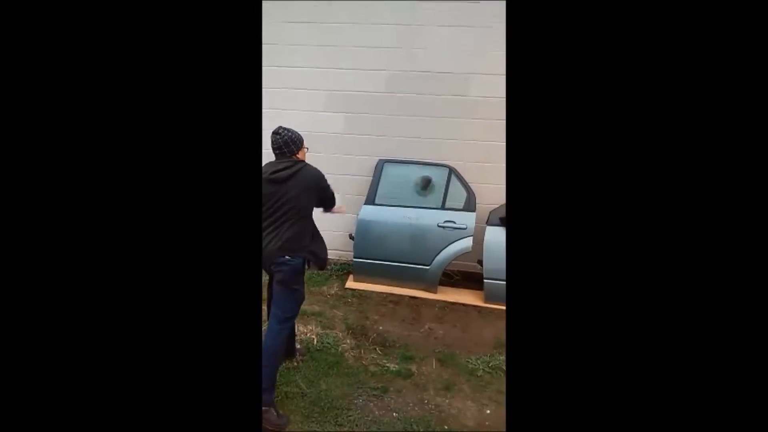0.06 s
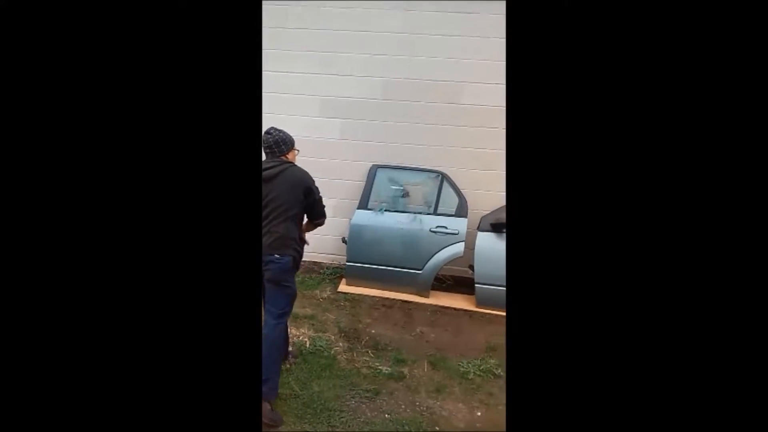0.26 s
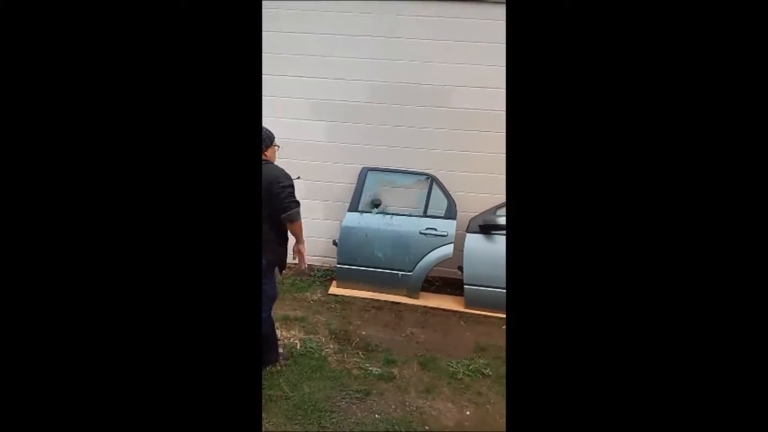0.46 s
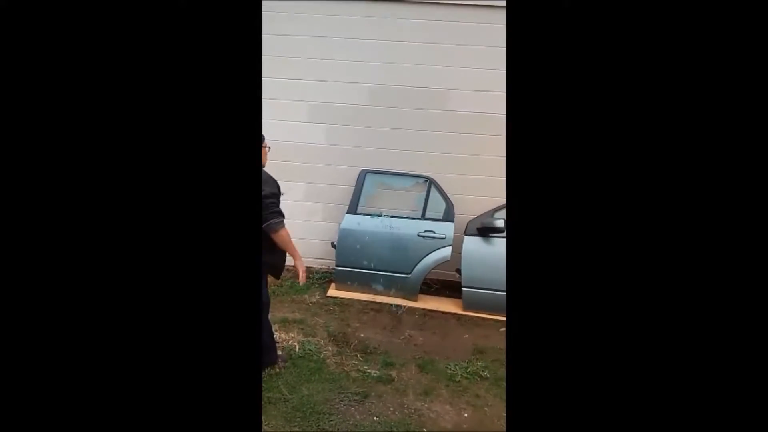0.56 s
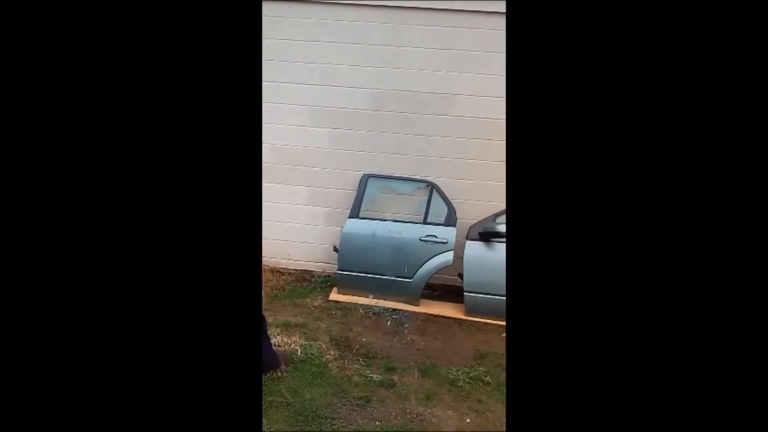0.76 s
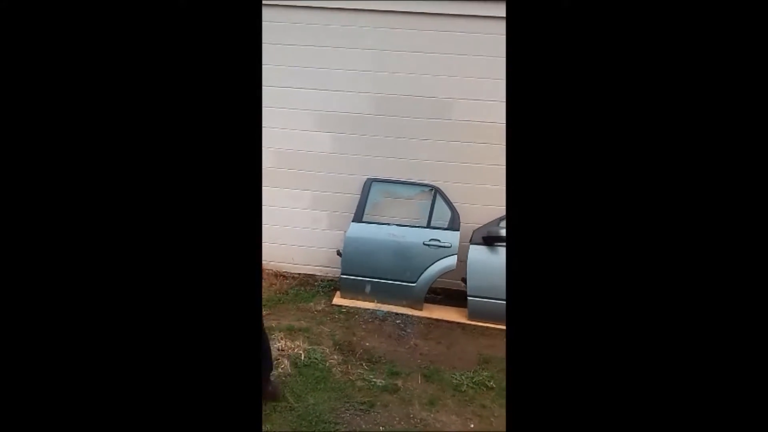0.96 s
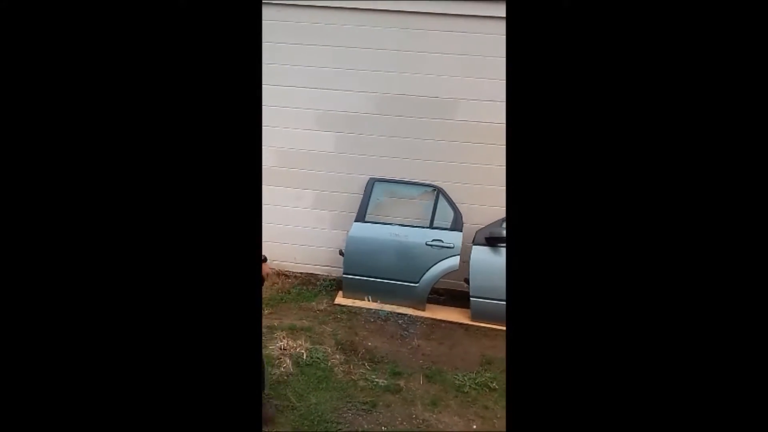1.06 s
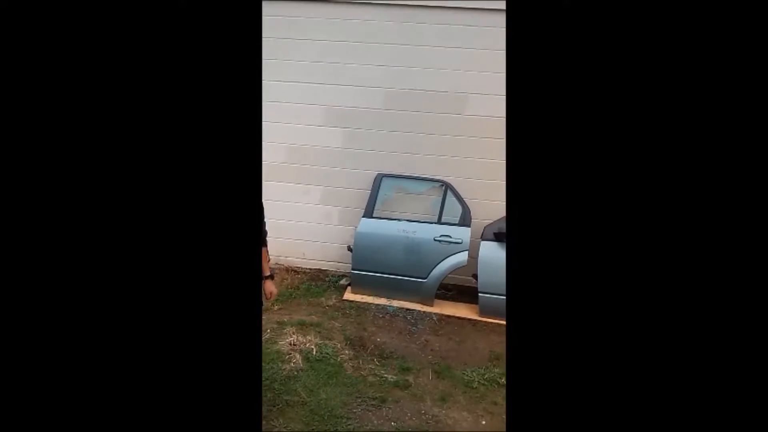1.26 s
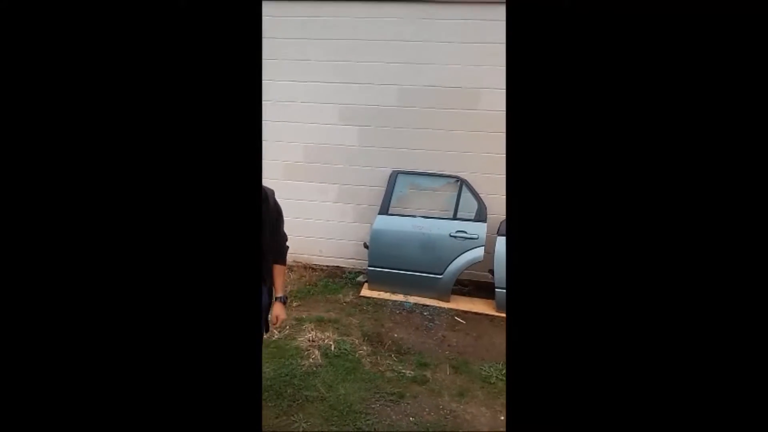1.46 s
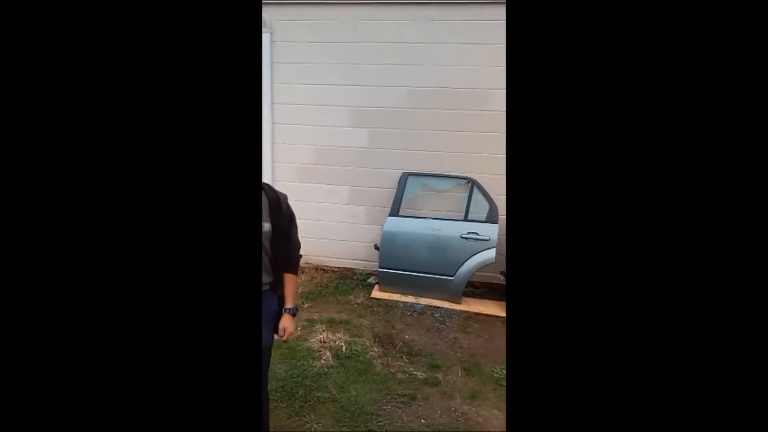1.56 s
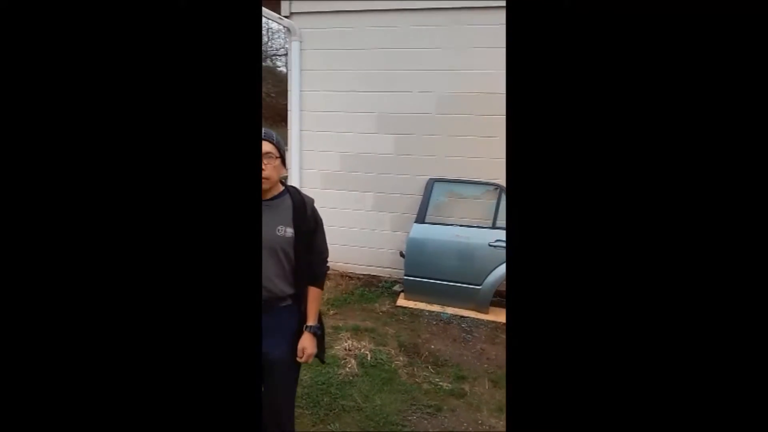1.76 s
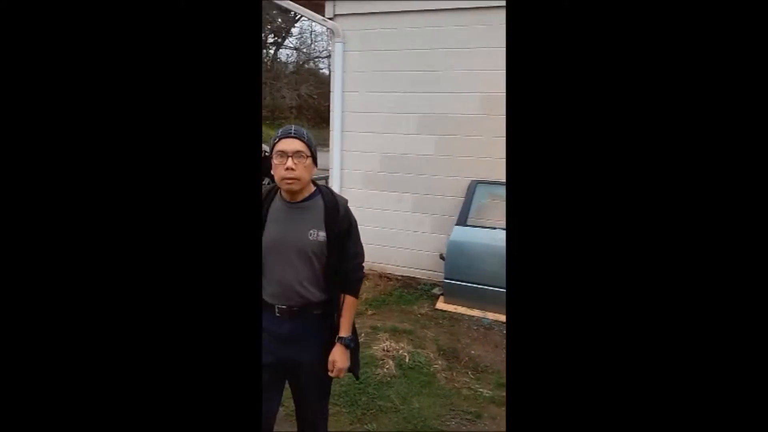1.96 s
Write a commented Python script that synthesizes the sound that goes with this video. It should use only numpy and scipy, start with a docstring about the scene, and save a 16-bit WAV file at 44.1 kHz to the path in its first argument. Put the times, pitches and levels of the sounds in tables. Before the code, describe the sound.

A car window shatters outdoors. After a faint sleeve swish and shoe scuff, the pane breaks at about 0.25 seconds with a sharp crack and dull boom. Glass granules sizzle and patter down the door, larger clumps knocking on the panel, until about 1.3 seconds. The last pieces clink and tick, settling by 1.8 seconds, with soft steps on grass over a faint distant hum.

```python
"""A car window shattering outdoors

A sleeve swishes and something hard goes through the tempered window of a loose car door leaning on a wall.
The pane cracks and booms, then crumbles: granules sizzle against each other and patter down the door,
larger clumps knock on the panel, and the last pieces clink and tick as they settle.
Shoes scuff and step on turf over a distant hum; wall and ground give the glass a short, faint tail."""
import sys
import numpy as np
from scipy import signal
from scipy.fft import rfft, irfft
from scipy.io import wavfile
from scipy.ndimage import uniform_filter1d

SR = 44100
rng = np.random.default_rng(int(sys.argv[2]) if len(sys.argv) > 2 else 0)


def store_wav(level_fs):
    """Save 16-bit WAV to argv[1]."""
    pcm = np.round(np.clip(np.atleast_2d(level_fs), -1, 1) * 32767)
    wavfile.write(sys.argv[1], SR, pcm.T.astype(np.int16))


N = 88200
T = np.arange(N) / SR
BREAK_S = 0.2428

# resonances of the door panel: frequency_hz, level_db
PANEL_SPECTRUM = [(110, -47), (180, -7.5), (216, -12.5), (257, -8), (292, -5), (441, -1.5), (561, -16),
                  (651, -9.5), (868, 0.5), (1070, -1.5), (1310, -9.5), (1630, -4), (2150, -1.5),
                  (2360, -4.5), (2800, -30), (3640, -29.5), (6160, -120)]
# sharp, hard contact: frequency_hz, level_db
CONTACT_SPECTRUM = [(2000, -38), (2700, -5), (3300, 2), (3900, 3), (4400, -8), (5150, 4.5), (5650, -6.5),
                    (6150, -1), (7000, -12.5), (9000, -8)]


def crack():
    """Brittle fracture: racing cracks release the pane's stress as a bang and a bright splitting."""
    # spectrum of the bang: frequency_hz, level_db
    bang_spectrum = [(60, -11), (300, 4), (700, -8), (1100, 5.5), (2000, -3), (3000, -8), (6000, -37),
                     (16000, -51)]
    # spectrum of the splitting: frequency_hz, level_db
    split_spectrum = [(500, -11), (2500, 7.5), (5500, -0.5), (8000, -8), (12000, 7.5), (16000, 3)]
    bang = burst(amp(6.5) * decay(BREAK_S, t60_s=0.037), bang_spectrum)
    split = burst(amp(-3) * decay(BREAK_S, t60_s=0.078), split_spectrum)
    return bang + split


def crunch():
    """Buckling: the crazed sheet folds inward just after the blow, in a fading run of tiny impulses."""
    # buckling sheet: frequency_hz, level_db
    spectrum = [(150, -12), (400, -0.5), (600, -8), (950, -0.5), (1700, 4.5), (2400, -8), (3200, -9),
                (4500, -37)]
    texture = even(colour(grains(per_s=1600, spread_db=1), spectrum), span_s=0.015)
    return amp(-14) * decay(0.272, t60_s=0.78) * texture


def granules():
    """Superposition: dense clicks of crumbling glass merge into a sizzle, and some granules ring."""
    # strength of the grinding: time_s, level_db
    level_curve = [(0.265, -21.5), (0.389, -12.5), (0.423, -11.5), (0.501, -13), (0.635, -10.5),
                   (0.949, -13.5), (1.245, -19.5), (1.511, -31), (1.645, -31.5), (1.693, -40),
                   (1.839, -45.5), (2.0, -55)]
    # granule against granule: frequency_hz, level_db
    spectrum = [(3820, -97), (6500, -12.5), (7390, -10.5), (8820, -3.5), (10100, -3), (11800, 2.5),
                (14100, 0), (15200, 0), (16000, -13)]
    level, = after_break(level_curve)
    sizzle = even(colour(grains(per_s=5000, spread_db=2.5), spectrum), span_s=0.023)
    rings = ringing(per_s=800, low_hz=8680, high_hz=15800, t60_s=0.045)
    tinkle = even(colour(rings, spectrum), span_s=0.034)
    return level * (amp(-3) * sizzle + amp(-3.5) * tinkle)


def patter():
    """Impact excitation: falling granules click on the door and drive its panel; larger pieces chink."""
    # strength of the shower: time_s, panel_db, contact_db
    level_curves = [(0.265, -28, -33), (0.343, -19, -27), (0.383, -25, -20.5), (0.419, -15.5, -20),
                    (0.587, -18, -20), (0.869, -21.5, -24.5), (0.975, -16, -21), (1.031, -21.5, -26.5),
                    (1.309, -25.5, -32.5), (1.375, -29.5, -34.5), (1.499, -28.5, -42.5),
                    (1.597, -37, -41.5), (1.693, -47, -47.5), (1.787, -41.5, -70), (1.85, -51, -55.5)]
    panel_level, contact_level = after_break(level_curves)
    hits = grains(per_s=1100, spread_db=-1.5)
    chinks = ringing(per_s=520, low_hz=896.5, high_hz=5590, t60_s=0.031)
    strikes = rms_one(hits) + amp(-6) * rms_one(chinks)
    panel = even(colour(strikes, PANEL_SPECTRUM), span_s=0.024)
    contact = even(colour(strikes, CONTACT_SPECTRUM), span_s=0.013)
    return amp(-0.5) * panel_level * panel + contact_level * contact


def knocks():
    """Resonance: faint knocks sound during the swing, then glass clumps strike the door's panel."""
    # knocks before and after the break: start_s, panel_db, contact_db, t60_s
    events = [(0.1688, -29.5, -56, .05), (0.217, -33, -45, 0.13), (0.236, -17, -54, 0.023),
              (0.255, -15, -16, 0.035), (0.2681, -4, -30, 0.019), (0.327, -13, -18, 0.048),
              (0.439, -19, -13, 0.049), (0.476, -13.5, -20, 0.17), (0.52, -14.5, -17, 0.062),
              (0.585, -19, -17, 0.029), (0.646, -18.5, -24, 0.058), (0.706, -10, -13.5, 0.035),
              (0.719, -8.5, -17, 0.061), (0.743, -17.5, -10.5, 0.082), (0.758, -11.5, -19, 0.045),
              (0.776, -16, -14.5, 0.22), (0.844, -8.5, -18, 0.22), (0.879, -27, -21, 0.044),
              (0.915, -9, -17, 0.027), (0.957, -26, -18.5, 0.13), (1.032, -9.5, -13.5, 0.045),
              (1.051, -39, -16, .02), (1.103, -21, -30, 0.035), (1.1333, -7, -33, 0.045),
              (1.173, -15.5, -24, 0.056), (1.193, -12.5, -34, 0.051), (1.208, -24, -13, 0.025),
              (1.225, -14.5, -44, 0.12), (1.238, -16.5, -13, 0.06), (1.264, -17, -23, 0.027),
              (1.32, -19, -23, 0.033), (1.346, -17, -22.5, .06), (1.413, -29, -21.5, 0.044),
              (1.371, -20.5, -18, 0.051), (1.4516, -12.5, -18, 0.035), (1.47, -20, -17.5, 0.058),
              (1.4938, -25, -24, 0.04), (1.555, -28.5, -24, 0.11), (1.622, -38, -37, 0.047)]
    panel_level = sum(amp(db) * decay(start, t60) for start, db, _, t60 in events)
    contact_level = sum(amp(db) * decay(start, t60) for start, _, db, t60 in events)
    panel = even(colour(rng.standard_normal(N), PANEL_SPECTRUM), span_s=0.0062)
    return panel_level * panel + burst(contact_level, CONTACT_SPECTRUM)


def clacks():
    """Damped vibration: one faint clack in the swing, then pieces strike the door with hollow notes."""
    # hollow notes: start_s, level_db, pitch_hz, t60_s
    notes = [(0.166, -40, 690, 0.045), (0.2683, -6, 977, 0.053), (0.476, -9.5, 1890, 0.09),
             (0.496, -16, 1116, 0.2), (0.53, -15, 2210, 0.11), (0.584, -10, 2110, .1),
             (0.72, -6.5, 993, 0.033), (0.755, -9, 882, 0.095), (0.773, -10.5, 853, 0.07),
             (0.765, -20, 407, 0.15), (0.847, -27, 298, 0.12), (0.91, -18.5, 362, 0.083),
             (1.135, -19, 333, 0.13), (0.844, -36, 950, 0.068), (1.03, -24, 443, 0.12),
             (1.038, -10, 3900, 0.028), (1.134, -8.5, 910, 0.072), (1.135, -3.5, 1718, 0.053),
             (1.19, -4, 1070, 0.039), (1.191, -6.5, 420, 0.043), (1.193, -13.5, 228, 0.056),
             (1.224, -11, 786, 0.053), (1.31, -24, 725, 0.23), (1.386, -17, 3940, 0.031),
             (1.452, -12.5, 3510, 0.03), (1.53, -26.5, 722, 0.087), (1.672, -26, 740, 0.1),
             (1.7145, -13, 1970, 0.022), (1.748, -19, 2980, 0.021)]
    return sum(amp(db) * decay(start, t60) * unsteady_tone(start, hz, width_hz=45.4)
               for start, db, hz, t60 in notes)


def thuds():
    """Slow forces excite low frequencies: the pane booms as it sags and glass reaches the ground."""
    # dull booms: start_s, level_db, rise_s, t60_s
    booms = [(0.245, -17.5, 0.0066, 0.85), (0.325, -15, 0.012, 0.29), (0.43, -31, 0.034, 0.91),
             (0.565, -29, 0.012, 1), (0.7, -42, 0.0088, 0.73), (0.87, -30, 0.022, .2),
             (0.94, -14, 0.054, 0.25), (1.13, -27, 0.0045, 0.12), (1.191, -29, 0.027, 0.79),
             (1.424, -30, 0.005, .2)]
    # their spectrum: frequency_hz, level_db
    spectrum = [(25, -22), (45, -12.5), (85, -10), (117, 4.5), (150, -2.5), (190, -6.5), (240, -7),
                (370, -10), (550, -18), (1200, -34.5)]
    return soft_impacts(booms, spectrum)


def clinks():
    """Free vibration: lone shards ring, each on one high mode."""
    # ringing shards: start_s, level_db, pitch_hz, t60_s
    shards = [(0.697, -7, 9550, 0.056), (0.79, -8, 12700, 0.058), (1.0485, -10, 12300, .09),
              (1.062, -6, 11880, 0.063), (1.156, -9, 10850, 0.041), (1.233, -6, 14150, 0.075),
              (1.284, -12, 8870, 0.066), (1.336, -9, 14480, 0.065), (1.3595, -4, 10660, 0.074),
              (1.449, -8, 12040, 0.033), (1.485, -27, 14900, .15), (1.5505, -12, 13500, 0.15),
              (1.55, -29, 14700, .08), (1.598, -14, 14880, 0.075), (1.704, -15, 10800, .04),
              (1.739, -23, 15600, .06), (1.775, -19, 13900, .04), (1.795, -13, 12300, .02)]
    return sum(amp(db) * decay(start, t60, rise_s=0.0016) * unsteady_tone(start, hz, width_hz=52)
               for start, db, hz, t60 in shards)


def ticks():
    """Brief contacts have broad spectra: glass snaps on glass, bright and without pitch."""
    # snaps: start_s, level_db, t60_s
    snaps = [(0.333, -22, .1), (0.518, -3, 0.026), (0.549, -13, 0.016), (0.743, -5, .015),
             (0.915, -15, .02), (1.027, -6.5, 0.031), (1.096, -9.5, .04), (1.205, -14, .02),
             (1.231, -7.5, 0.022), (1.303, -15.5, 0.18), (1.367, -4, 0.033), (1.385, -27, .03),
             (1.411, -11.5, 0.035), (1.469, -25, 0.02), (1.5519, -4.5, 0.015), (1.557, -18.5, 0.2),
             (1.698, -22, .04), (1.7146, -10, 0.0065), (1.728, -21, 0.015), (1.763, -23.5, 0.043),
             (1.783, -25, 0.022), (1.7996, -18, 0.0074), (1.825, -27, 0.11)]
    # glass on glass: frequency_hz, level_db
    spectrum = [(2500, -37), (6500, -10.5), (9000, 1), (12000, 9), (13500, 8), (16000, -1)]
    envelope = sum(amp(db) * decay(start, t60, rise_s=0.0012, hold_s=0.00052) for start, db, t60 in snaps)
    return burst(envelope, spectrum)


def chips():
    """Heavily damped impacts: the last chips click as they land."""
    # landings: start_s, level_db
    landings = [(1.7139, -21), (1.73, -29), (1.739, -35), (1.7435, -19.5), (1.7482, -25), (1.7816, -34)]
    # a landing chip: frequency_hz, level_db
    spectrum = [(700, -12), (1500, -6), (2000, -1), (2500, -1), (3000, 6), (4000, 5), (6500, -4),
                (9000, -17), (14000, -20)]
    envelope = sum(amp(db) * decay(start, t60_s=0.013, hold_s=0.001) for start, db in landings)
    return burst(envelope, spectrum)


def steps():
    """Cushioned impact: turf softens the thrower's departing steps to low thumps."""
    # footfalls: start_s, level_db, rise_s, t60_s
    footfalls = [(1.34, -42, 0.022, 0.41), (1.59, -34, 0.026, 0.24), (1.785, -30, .025, 0.16)]
    # a foot on grass: frequency_hz, level_db
    spectrum = [(22, -1), (55, 1), (80, -6), (120, 0), (170, -25), (300, -18)]
    return soft_impacts(footfalls, spectrum)


def sleeve():
    """Sliding friction: cloth swishes as the arm swings."""
    # swishes: centre_s, level_db, width_s
    swishes = [(0.104, -37.5, .004), (0.116, -37, 0.0041), (0.11, -43.5, 0.021), (0.175, -36, .009),
               (0.212, -29, 0.0084), (0.227, -31, 0.0085)]
    # rubbing cloth: frequency_hz, level_db
    spectrum = [(1500, -17), (4000, -22), (5600, -8), (7000, -15), (9000, -3), (12000, 4.5), (16000, -9)]
    return rub(swishes, spectrum)


def shoes():
    """Sliding friction: soles scuff the turf with a dull rasp."""
    # scuffs: centre_s, level_db, width_s
    scuffs = [(0.177, -25.5, 0.011), (0.226, -20.5, 0.01), (1.67, -38.5, 0.055), (1.84, -48, 0.091)]
    # sole on turf: frequency_hz, level_db
    spectrum = [(80, -13), (250, 6), (750, 6.5), (1100, 0), (1700, 7.5), (2600, -34), (6000, -28)]
    return rub(scuffs, spectrum)


def yard(direct):
    """Scattering: the wall and the ground add a short, faint tail to the direct sound."""
    tail = rng.standard_normal(N) * decay(0.0055, t60_s=0.25)
    return direct + amp(-13) * signal.fftconvolve(direct, tail / np.linalg.norm(tail))[:N]


def outdoor_air():
    """Stationary noise: a distant outdoor hum, strongest in the bass."""
    # distant hum: frequency_hz, level_db
    spectrum = [(25, -13), (45, 8.5), (70, -1), (120, 5.5), (165, -17.5), (350, -13.5), (650, -20),
                (1000, -5.5), (1300, -21), (1750, -19.5), (2300, -29.5), (4400, -45), (8000, -38),
                (12500, -29), (16000, -35)]
    return amp(-42.5) * rms_one(colour(rng.standard_normal(N), spectrum))


def amp(db):
    """Decibels to amplitude gain."""
    return 10 ** (np.asarray(db) / 20)


def rms_one(x):
    """Normalisation to unit power."""
    return x / np.sqrt(np.mean(x ** 2) + 1e-20)


def colour(x, spectrum):
    """Minimum-phase filter of unit energy through (Hz, dB) points, falling 36 dB an octave outside."""
    size = 8192
    hz, db = np.transpose(spectrum)
    octave = np.log2(np.maximum(np.fft.rfftfreq(size, 1 / SR), 1))
    point_octaves = np.log2(hz)
    octaves_outside = np.abs(octave - np.clip(octave, point_octaves[0], point_octaves[-1]))
    shape_db = np.interp(octave, point_octaves, db) - 36 * octaves_outside
    cepstrum = irfft(np.log(amp(np.maximum(shape_db, -90))))
    cepstrum[1:size // 2] *= 2  # folding onto positive time makes the filter causal
    cepstrum[size // 2 + 1:] = 0
    response = irfft(np.exp(rfft(cepstrum)))
    return signal.fftconvolve(x, response / np.linalg.norm(response))[:N]


def even(x, span_s):
    """Division by the running RMS steadies the power and keeps the finer grain."""
    power = uniform_filter1d(x ** 2, max(int(span_s * SR), 2))
    return x / np.sqrt(np.maximum(power, 0) + np.mean(x ** 2) / 100)


def grains(per_s, spread_db):
    """Poisson impulses: a few contacts are much stronger than the rest (weaker if spread_db < 0)."""
    sizes = amp(spread_db * np.minimum(rng.exponential(1, N), 5)) * rng.choice([-1, 1], N)
    return sizes * (rng.random(N) < per_s / SR)


def ringing(per_s, low_hz, high_hz, t60_s, count=64):
    """Damped resonators: random contacts fall on pieces of many sizes, each with one short-lived mode."""
    hits = grains(per_s, spread_db=3.0)
    struck_piece = rng.integers(0, count, N)
    rings = 0
    for piece, (place, life) in enumerate(rng.random((count, 2))):
        hz = low_hz * (high_hz / low_hz) ** ((piece + place) / count)
        angle = 2 * np.pi * hz / SR
        radius = np.exp(-np.log(1000) / (t60_s * (0.5 + life) * SR))
        feedback = [1, -2 * radius * np.cos(angle), radius * radius]
        rings = rings + signal.lfilter([0, np.sin(angle)], feedback, hits * (struck_piece == piece) + 1e-18)
    return rings


def decay(start_s, t60_s, rise_s=1e-4, hold_s=0):
    """Exponential damping after a linear rise and a hold: 60 dB down in t60_s."""
    age = T - start_s
    return np.clip(age / rise_s, 0, 1) * amp(-60 * np.maximum(age - rise_s - hold_s, 0) / t60_s)


def after_break(curves, settle_db_per_s=84):
    """Level curves as gains: silent until the pane breaks, decaying exponentially past the last point."""
    times, *columns = np.transpose(curves)
    settling = amp(-settle_db_per_s * np.maximum(T - times[-1], 0))
    return [amp(np.interp(T, times, db)) * (T > BREAK_S) * settling for db in columns]


def burst(envelope, spectrum):
    """Source and filter: a rush of tiny impulses under an envelope sounds through a body."""
    return colour(envelope * rng.choice([-1., 1.], N), spectrum)


def unsteady_tone(start_s, hz, width_hz):
    """Line broadening: a mode's phase wanders, as when a piece rubs against others."""
    wander = np.cumsum(rng.standard_normal(N)) * np.sqrt(2 * np.pi * width_hz / SR)
    return np.sin(2 * np.pi * hz * (T - start_s) + uniform_filter1d(wander, size=40))


def soft_impacts(events, spectrum):
    """Gradual onsets soften a blow: coloured noise rises and decays with each event."""
    envelope = sum(amp(db) * decay(start, t60, rise) for start, db, rise, t60 in events)
    return envelope * even(colour(rng.standard_normal(N), spectrum), span_s=0.026)


def rub(strokes, spectrum):
    """Friction noise: dense tiny contacts swell and fade in a bell curve for each stroke."""
    envelope = sum(amp(db) * np.exp(-0.5 * ((T - centre) / width) ** 2) for centre, db, width in strokes)
    return envelope * even(colour(grains(per_s=4600, spread_db=3.5), spectrum), span_s=0.014)


def scene():
    """Pressures add: the window, the thrower and the air are heard at one point, alike in both channels."""
    impacts = crack() + crunch() + granules() + patter() + knocks() + clacks()
    impacts += thuds() + steps() + clinks() + ticks() + chips()
    air = outdoor_air()
    return np.tile(yard(impacts) + sleeve() + shoes() + air, (2, 1))


def record(dry):
    """Soft saturation rounds the loudest peaks, and a steep low-pass cuts the highest treble."""
    ceiling, cutoff_hz = 0.65, 15900
    rounded = dry / (1 + (dry / ceiling) ** 4) ** (1 / 4)
    return signal.sosfilt(signal.ellip(10, 0.2, 70, cutoff_hz, fs=SR, output="sos"), rounded)


dry = scene()
out = record(dry)
store_wav(out)
```